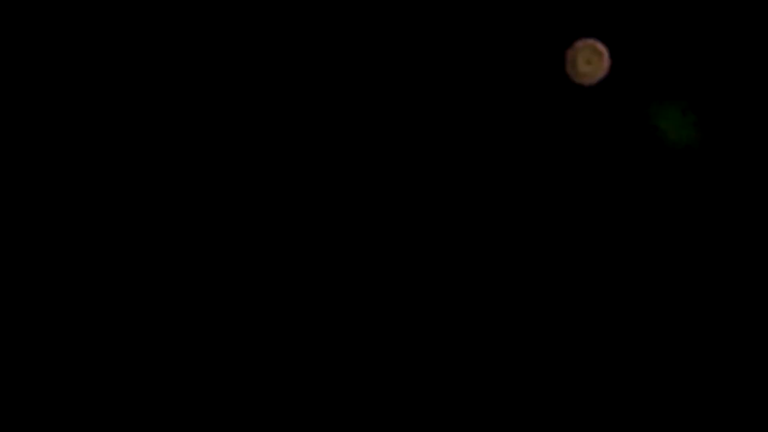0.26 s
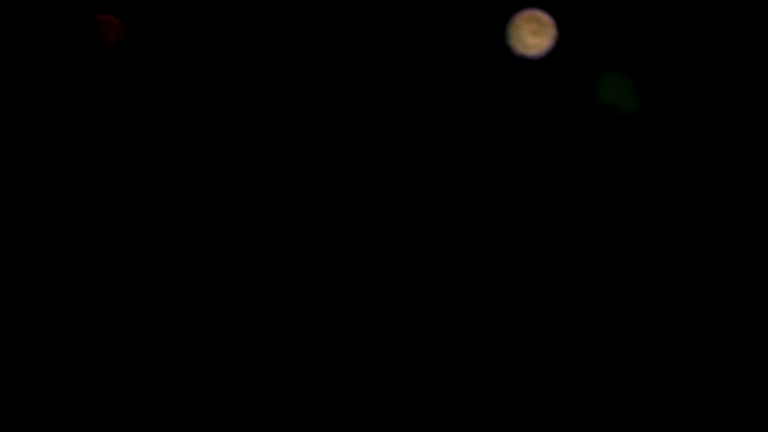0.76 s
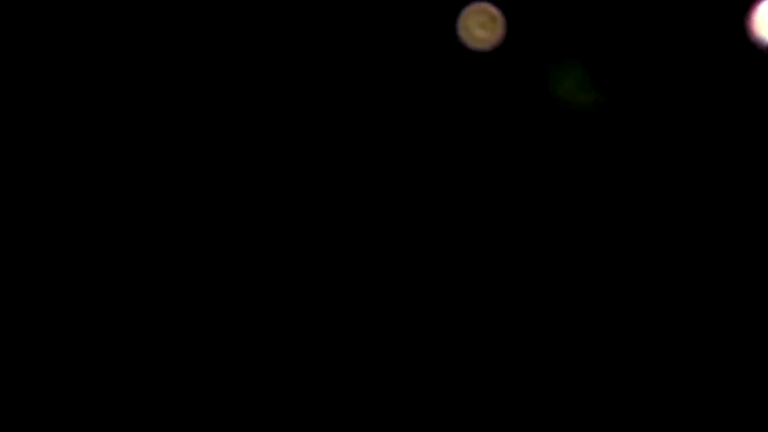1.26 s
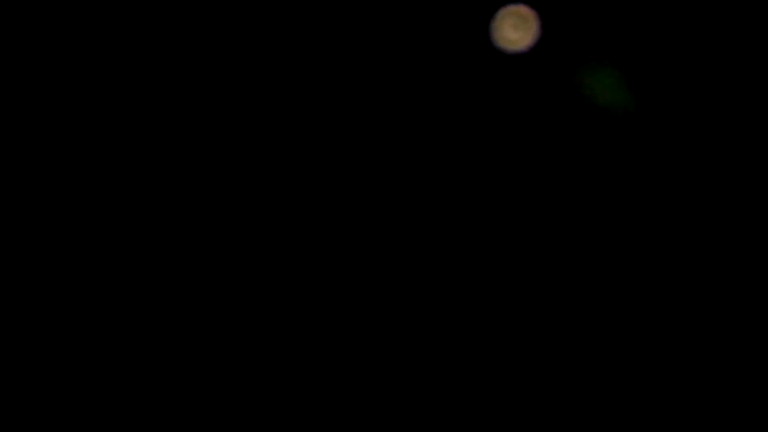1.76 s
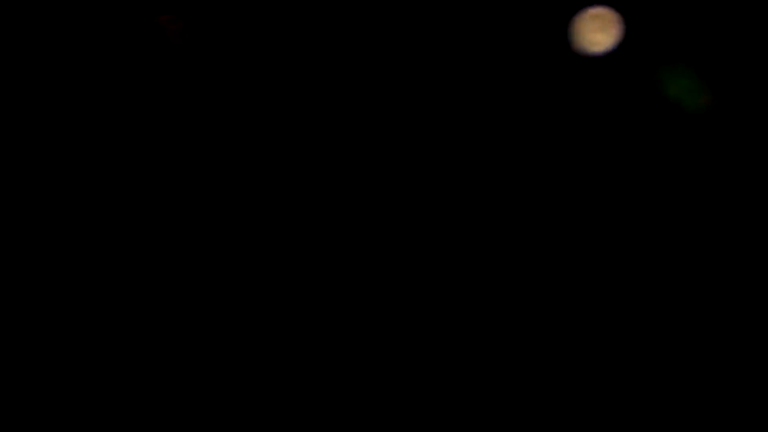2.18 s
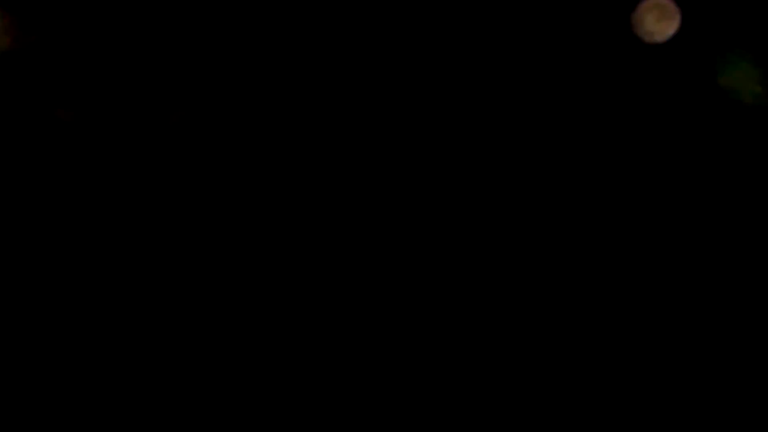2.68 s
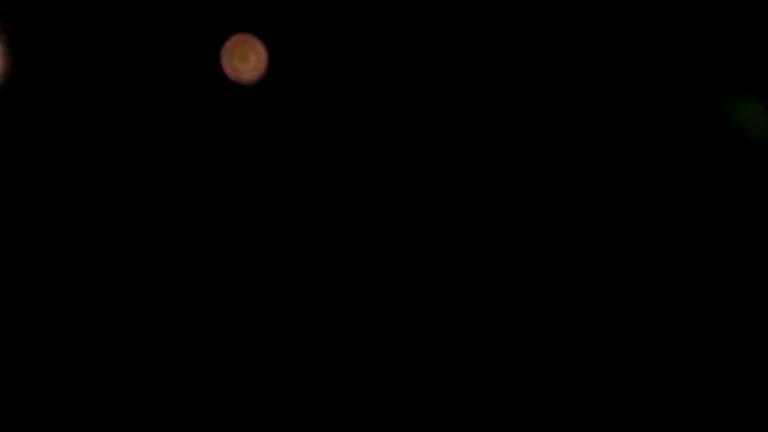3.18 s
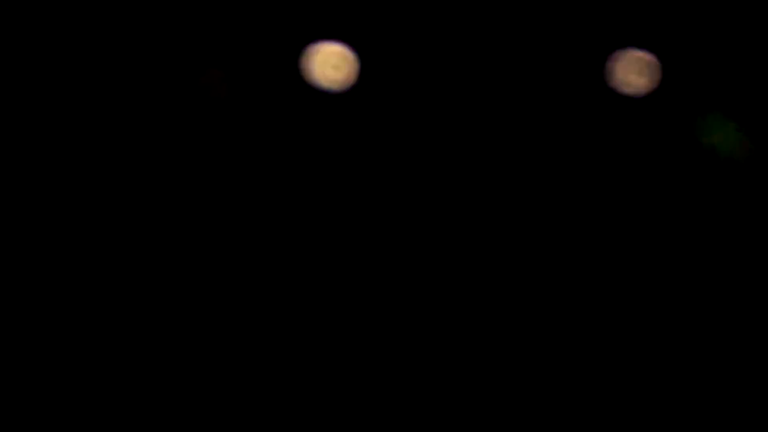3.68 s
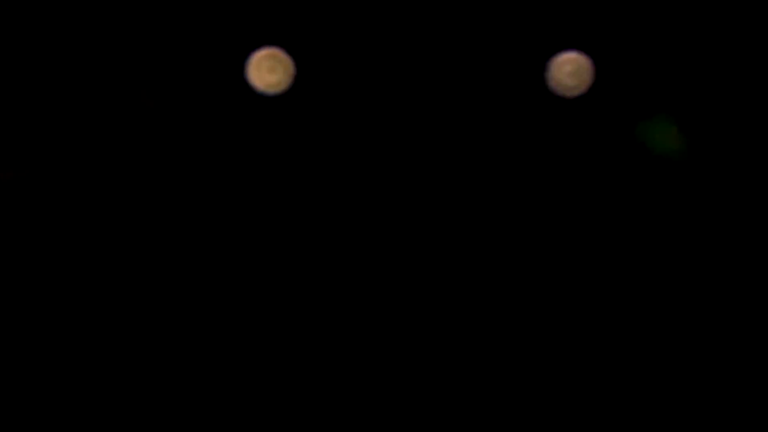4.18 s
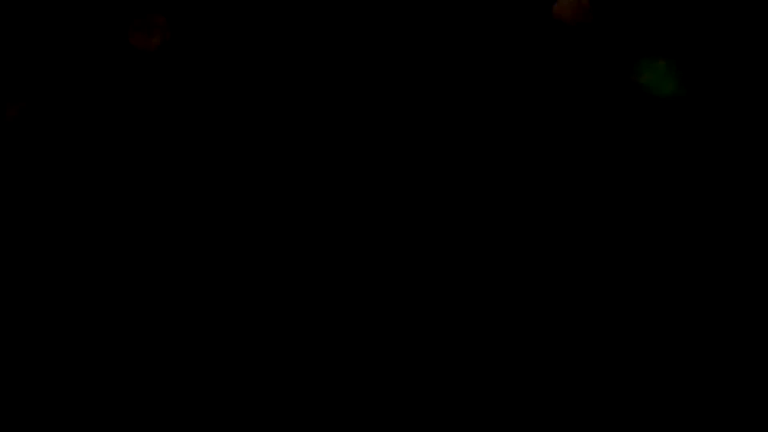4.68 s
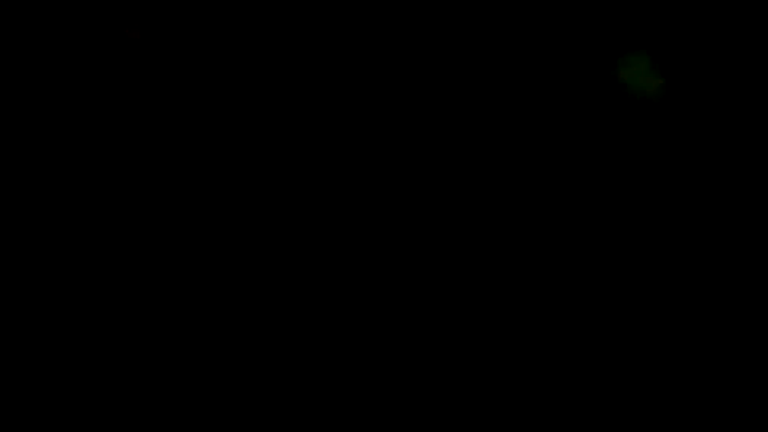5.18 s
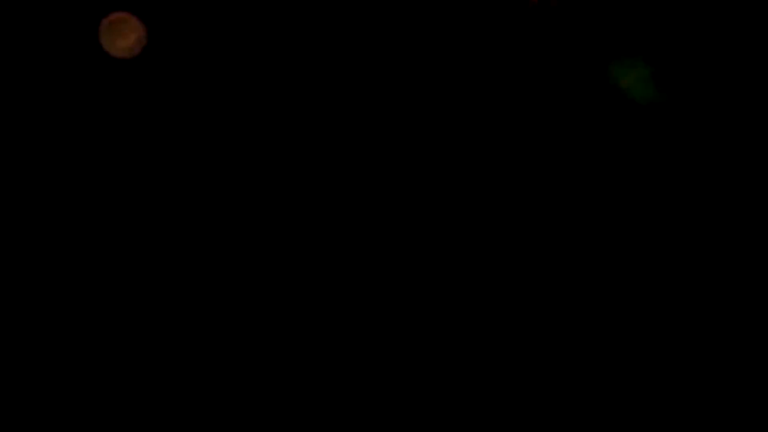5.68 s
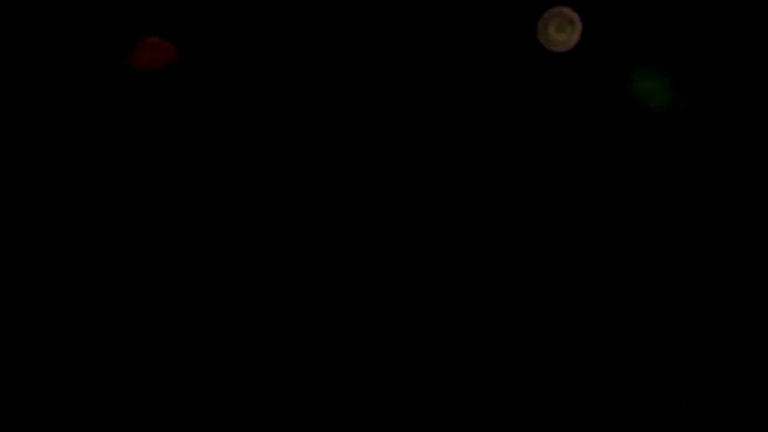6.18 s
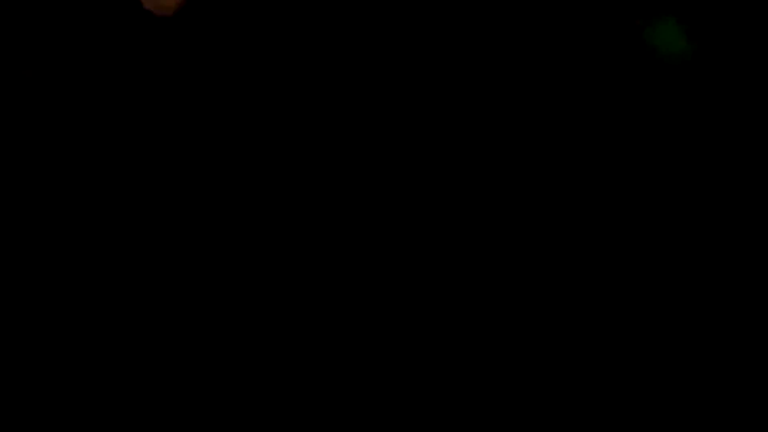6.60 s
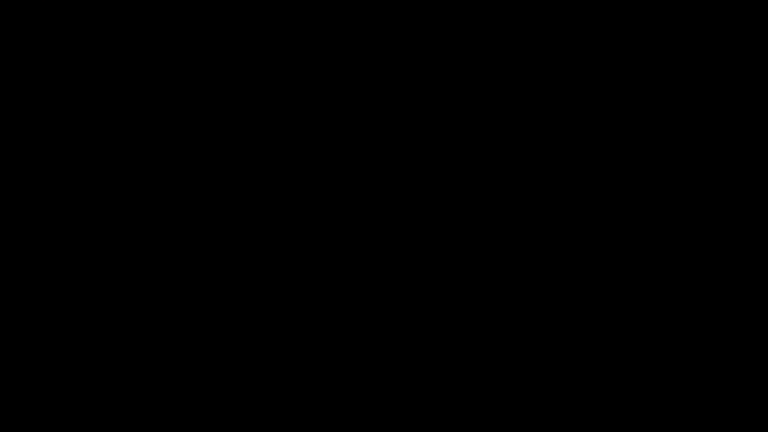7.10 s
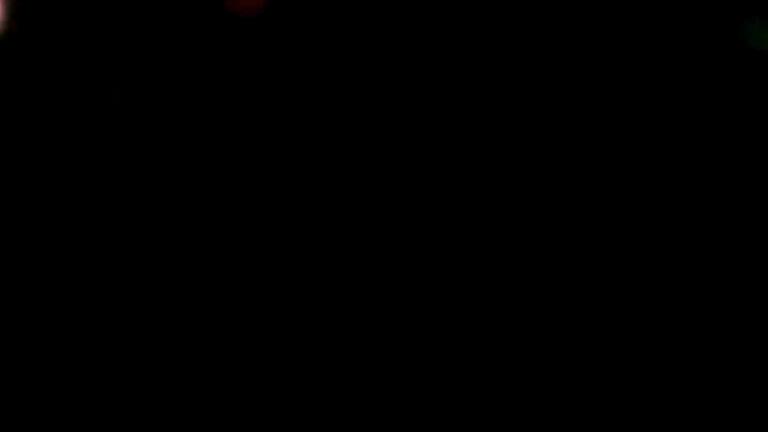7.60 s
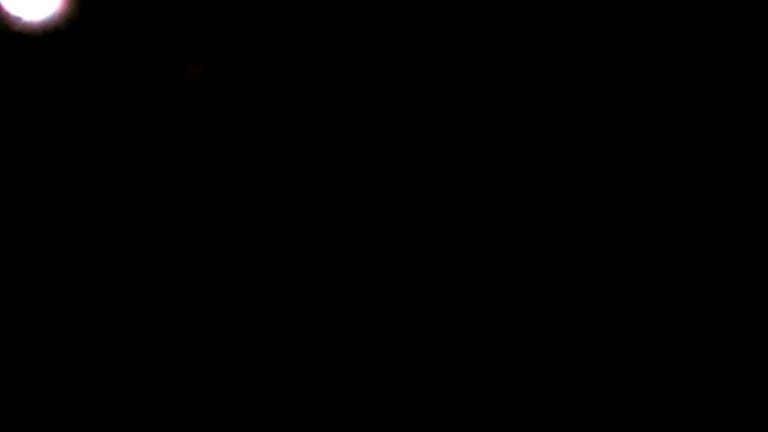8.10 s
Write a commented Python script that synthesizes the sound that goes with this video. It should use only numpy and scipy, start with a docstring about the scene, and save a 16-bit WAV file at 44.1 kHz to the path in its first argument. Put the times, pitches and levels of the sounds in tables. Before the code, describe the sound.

Outdoors at night, dry leaves tick and rustle near the microphone over a faint rumble, hum and insect hiss. A coyote gives two short hoarse barks, then a long howl slides slowly downward while more barks cut in. A second coyote joins with a higher, warbling howl, and after another bark a third follows with a yodeling, breaking call. The calls echo faintly over open ground.

```python
"""Dry leaves tick and rustle close by, over a night bed of distant rumble, faint hum and insect hiss.
A coyote barks hoarsely, puffs of air ringing its throat. Then three animals howl in turn, long pitched
calls that yodel and break, with more barks between them. Open ground smears each call and a far slope
returns it late. Two unequal microphone ports make the stereo image."""
import sys
import numpy as np
from scipy import signal
from scipy.fft import rfft, irfft, next_fast_len
from scipy.io import wavfile
from scipy.ndimage import uniform_filter1d

SR = 44100
rng = np.random.default_rng(int(sys.argv[2]) if len(sys.argv) > 2 else 0)


def transcribe(signal):
    """Save signal, clipped to [-1, 1], as a 16-bit WAV file at the path in sys.argv[1]."""
    frames = np.atleast_2d(signal).T
    limited = np.clip(frames, -1, 1)
    pcm = np.round(limited * 32767).astype(np.int16)
    wavfile.write(sys.argv[1], SR, pcm)


N = 367794
TIME = np.arange(N) / SR
FFT_SIZE = next_fast_len(N + SR)
HZ = np.maximum(np.arange(FFT_SIZE // 2 + 1) * SR / FFT_SIZE, 1)


def from_db(db):
    """Decibels to gain."""
    return 10 ** (np.asarray(db) / 20)


def unit_rms(x):
    """Scale to rms 1."""
    return x / np.sqrt(np.mean(x ** 2) + 1e-20)


def at_hz(curve, hz, column=1):
    """Read an EQ curve on a log-frequency axis."""
    curve = np.array(curve)
    return np.interp(np.log(hz), np.log(curve[:, 0]), curve[:, column])


def drift(per_s, size=N):
    """Random modulator with a spread of about 1."""
    knots = rng.standard_normal(int(size * per_s / SR) + 3)
    return np.interp(np.arange(size) * per_s / SR, np.arange(len(knots)), knots) * np.sqrt(1.5)


def resonance(x, hz, width_hz):
    """Two-pole resonator, gain 1 at its peak."""
    r = np.exp(-np.pi * width_hz / SR)
    gain = (1 - r * r) / 2
    return signal.lfilter([gain, 0, -gain], [1, -2 * r * np.cos(2 * np.pi * hz / SR), r * r], x + 1e-18)


def band(x, low_hz, high_hz):
    """Band-pass."""
    return signal.sosfilt(signal.butter(2, [low_hz, high_hz], "band", fs=SR, output="sos"), x + 1e-18)


def automation(times, *lanes):
    """A call's sample span, and each lane of breakpoints drawn across it."""
    span = slice(int(times[0] * SR), min(int(times[-1] * SR), N))
    return span, [np.interp(TIME[span], times, lane) for lane in lanes]


# EQ of the rumble and hiss: (frequency [Hz], gain [dB])
BED_EQ = [(25, -11), (50, -13), (66, 1), (101, 11), (130, 6.5), (194, -6.5), (305, -9), (733, -5),
          (2000, -8.5), (2600, -22.5), (5200, -19.5), (16000, -36)]
# how alike the bed is at the two ports: (frequency [Hz], correlation [0-1])
BED_CORRELATION = [(60, 0.54), (140, 1), (280, 0.38), (700, 0.61), (2000, 0.017), (5000, 0.043),
                   (10000, 0.064)]


def night_bed(floor_db=-53.5):
    """Distant rumble and hiss, partly shared by both ports, with mains hum and a band of insects."""
    left, spare = rfft(rng.standard_normal((2, FFT_SIZE)))
    alike = at_hz(BED_CORRELATION, HZ)
    pair = np.array([left, alike * left + np.sqrt(1 - alike ** 2) * spare])
    floor = from_db(floor_db) * unit_rms(irfft(pair * from_db(at_hz(BED_EQ, HZ)), FFT_SIZE)[:, :N])
    hum = from_db(-66.5 + 3.9 * drift(7.7)) * np.sin(2 * np.pi * 360 * TIME)
    insects = from_db(-71.5 + 5 * drift(25)) * unit_rms(resonance(rng.standard_normal(N), 5150, 270))
    return floor + hum + insects


def ring_out(hits, decay_s, soften_samples):
    """Turn impulses into decaying envelopes with a soft attack."""
    return uniform_filter1d(signal.lfilter([1], [1, -np.exp(-1 / (decay_s * SR))], hits), soften_samples)


# fader ride of the stirring leaves: (time [s], level [dB])
LEAF_STIR = [(0, -74), (.24, -68.5), (.9, -73.5), (1.6, -68), (2.2, -68.5), (2.55, -73.5), (2.84, -81),
             (2.92, -61), (3.24, -75.5), (3.3, -65), (3.8, -71.5), (4.3, -70.5), (5.6, -66.5),
             (6.34, -73.5), (6.85, -71.5), (7.3, -66.5), (7.8, -68), (8.34, -70)]
# EQ of the leaf noise: (frequency [Hz], gain [dB])
LEAF_EQ = [(1500, -68), (2500, -5.5), (4200, 8), (6400, 1.5), (8600, 5.5), (9900, -1), (14500, -5),
           (16000, -11)]
# featured leaf ticks: (time [s], hit level [dB], treble against body [dB])
LEAF_TICKS = [(0.4296, -40, 5), (0.684, -37, -15), (0.857, -55.5, 20), (0.935, -42, 7), (1.0124, -30, -34),
              (1.209, -33, -8), (1.5125, -55.5, 12.5), (1.84, -43, 4.5), (2.158, -48, 3), (2.351, -39, -2),
              (2.491, -35.5, -37), (2.641, -40, 3), (2.9507, -37, -18), (2.9946, -39, 8),
              (3.2926, -33.5, 5.5), (3.4204, -34.5, 1.5), (3.596, -39, -1), (3.7585, -40, 2),
              (3.826, -37, 4), (3.911, -39, 9), (3.9656, -32, -19), (4.0284, -30, -12), (4.06, -40, -14),
              (4.356, -38, -38), (4.492, -38, 6), (4.52, -36, -13), (4.6122, -42, -29), (4.9398, -36, -4),
              (5.139, -40, -2), (6.2785, -36, -40), (6.3894, -42, 5), (6.458, -59, 24.5),
              (6.5824, -32, -18), (7.0095, -30.5, -15), (7.076, -31, -32), (7.272, -32, -7),
              (7.76, -31, -5)]


def leaves(ticks_per_s, small_db, spread_db):
    """Dry leaves hiss in patches and tick: a crack, then a short wash. Small ticks fall in clumps."""
    tick_s, tick_db, treble_db = np.transpose(LEAF_TICKS)
    tick_at = np.round(tick_s * SR).astype(int)
    stir_db = np.interp(TIME, *np.transpose(LEAF_STIR))
    clumps = drift(12)
    small_ticks = rng.random(N) < ticks_per_s * from_db(2.2 * clumps) / SR
    size_db = stir_db + small_db + spread_db * np.minimum(rng.exponential(1, N), 2.5)
    white = rng.standard_normal((3, FFT_SIZE))
    wide = 0.11 * white[0] + 3.7 * white[1:]
    grain = unit_rms(irfft(rfft(wide) * from_db(at_hz(LEAF_EQ, HZ)), FFT_SIZE)[:, :N])
    out = 0
    for low_hz, high_hz, small_trim_db, tick_trim_db in [
            (1730, 3950, -1, 2), (4210, 5460, 1.5, 2),
            (6750, 9700, -2, treble_db - .5), (10600, 15700, -.5, treble_db - 2)]:
        # a random gain in each band gives every tick its own colour
        hits = small_ticks * from_db(size_db + small_trim_db + rng.normal(0, 6, N))
        hits[tick_at] = from_db(tick_db + tick_trim_db + rng.normal(-1, 3.5, len(tick_at)))
        crack = ring_out(hits, decay_s=.0014, soften_samples=170)
        wash = .15 * ring_out(hits, decay_s=.014, soften_samples=420)
        hiss = from_db(stir_db + 11 + 2 * clumps + 2.3 * drift(19))
        out = out + (crack + wash + hiss) * band(grain, low_hz, high_hz)
    return out


def bark_contour(start, attack, hold, release, start_hz=492.3, top_hz=702, rise_s=.075):
    """One bark swells, holds and drops while its pitch climbs, then stays."""
    t = np.linspace(0, attack + hold + release, 40)
    attack_db = -15.5 * (1 - np.clip(t / attack, 0, 1)) ** 2
    release_db = -27 * np.clip((t - attack - hold) / release, 0, 1)
    rise = np.sin(np.pi / 2 * np.clip(t / rise_s, 0, 1)) ** 2
    return automation(start + t, start_hz + (top_hz - start_hz) * rise, attack_db + release_db)


# bark cues: (start [s], attack [s], hold [s], release [s], level [dB], roughness [capped at 1],
# upper throat [dB], treble [dB])
BARK_CUES = [(0.576, 0.069, 0.037, 0.026, -33, 1.2, 3.5, -7),
             (1.333, 0.009, 0.093, 0.011, -30.5, 0.33, 0, -3),
             (3.032, 0.049, 0.045, 0.075, -31, 1.07, 0.5, -11),
             (4.119, 0.035, 0.053, 0.021, -30.5, 0.86, 0.5, -8.5),
             (4.631, 0.091, 0.0068, 0.014, -30.5, 0.42, 5, -5),
             (6.634, 0.053, 0.035, 0.048, -32.5, 0.81, 0.5, -9.5)]
# throat formants: (frequency [Hz], width [Hz], gain [dB])
THROAT_FORMANTS = [(661, 123, -16), (1203, 430, -3.5), (1840, 215, 5.5), (2614, 260, -14),
                   (3720, 1500, -20), (7500, 2470, -17.5)]


def barks(hoarse_tilt_db, flutter_db):
    """One puff of air per cycle rings the throat; a hoarse bark is uneven and brighter."""
    puffs, envelope, hoarse, upper_db, treble_db = np.zeros((5, N))
    for *timing, level_db, rough, upper, treble in BARK_CUES:
        span, (pitch, shape_db) = bark_contour(*timing)
        rough = min(rough, 1)
        cycles = np.flatnonzero(np.diff(np.floor(np.cumsum(pitch) / SR)))
        shimmer, jitter = rng.standard_normal((len(cycles), 2)).T
        every_third = np.cos(2 * np.pi * np.arange(len(cycles)) / 3)   # accents that make the growl
        strength = (1 + rough * (.9 * every_third + .28 * shimmer)) / np.sqrt(1 + .8 * rough ** 2)
        late = (.07 * rough * jitter * SR / pitch[cycles]).astype(int)
        puffs[span.start + cycles + late] = strength / np.sqrt(pitch[cycles])
        envelope[span] = from_db(level_db + shape_db)
        hoarse[span], upper_db[span], treble_db[span] = rough, upper, treble
    voice = 0
    for k, (hz, width, db) in enumerate(THROAT_FORMANTS):
        formant = (-1) ** k * resonance(resonance(puffs, hz, width), hz, 1.35 * width)
        tone_db = db + (k > 1) * upper_db + (k > 3) * treble_db
        tilt_db = hoarse_tilt_db * min(k, 2) * (hoarse - 1.52)
        voice += from_db(tone_db + tilt_db + flutter_db * drift(60)) * formant
    return envelope * voice / np.sqrt(np.mean(voice[envelope > 0] ** 2))


# melody per phrase, far animal first: (time [s], pitch [Hz], base level [dB], tilt [dB/octave])
HOWL_PHRASES = [
    [(1.58, 467, -55, -9), (1.64, 637, -52.5, -10), (1.67, 684, -55, -4), (1.685, 750, -45.5, 0),
     (1.692, 861, -41, -2.5), (1.78, 871.6, -34.5, 2), (1.87, 851, -42.5, -2.5), (1.96, 874, -36, 1),
     (2.148, 838.7, -42.5, -1.5), (2.165, 787, -52, -10.5), (2.31, 744.3, -53, -0.5), (2.44, 733, -58, 3),
     (2.57, 714.6, -55, 0.5), (2.7, 690, -58, -4), (2.85, 696.5, -61, -6), (3.3, 675.7, -53.5, 0),
     (3.55, 690.6, -59, -8), (3.733, 668.2, -52.5, 0), (3.867, 643, -53, -7), (4.0, 605, -52.5, -5),
     (4.26, 534.7, -50.5, -3), (4.4, 489, -59, -6), (4.53, 542, -50.5, -3), (4.6, 569, -61.5, -16),
     (4.8, 600.6, -54.5, -2.5), (5.3, 581.5, -55, -4.5)],
    [(4.715, 861, -49, 9), (4.8, 930, -46.5, 8), (4.9, 1006, -43, -3.5), (5.0, 1028, -43.5, -4.5),
     (5.1, 1089, -44.5, -9.5), (5.216, 1116, -41, -10)],
    [(5.214, 1008, -37, 5.5), (5.309, 1031, -39.5, 8.5), (5.42, 1036, -41, 16), (5.5, 1032, -40, 11),
     (5.58, 1012, -39, 8), (5.685, 953, -43.5, 11), (5.703, 1050, -48.5, -2), (5.73, 1063, -49, 1),
     (5.76, 1017, -43, 5), (5.79, 896, -41.5, 17.5), (5.82, 877, -44.5, 6.5), (5.876, 1095, -42.5, 11),
     (5.882, 1282, -36, 16), (5.908, 1245, -38, 19), (5.915, 995, -40, 9), (5.95, 958, -46.5, 14),
     (6.01, 1012, -38, 10.5), (6.07, 972.4, -47.5, 10.5), (6.13, 1010, -40, 15), (6.19, 934, -54.5, 8.5),
     (6.23, 789, -47, 1.5), (6.3, 736, -50.5, 4), (6.33, 676.6, -53.5, -1), (6.42, 694, -73.5, -7)],
    [(6.89, 485, -46.5, -10), (6.93, 640, -50.5, -13), (6.97, 805, -44, -3), (7.0, 808, -44, -2.5),
     (7.065, 834, -48.5, -11.5), (7.13, 865, -39.5, 10), (7.17, 798.5, -41.5, 1.5), (7.3, 840, -41.5, 0.5),
     (7.33, 694, -46, 13), (7.362, 703, -40.5, 5), (7.368, 821, -39.5, 0.5), (7.45, 808.7, -47, 2.5),
     (7.512, 776, -45.5, 2), (7.527, 670, -42.5, 13), (7.58, 652.7, -44, 25), (7.672, 677.5, -48, 6),
     (7.679, 765, -49, -5), (7.764, 751, -45.5, -2), (7.842, 732.7, -53.5, -2.5), (8.0, 723, -49, -8),
     (8.15, 682, -51.5, -8), (8.185, 653, -43, 18), (8.2, 570.5, -53.5, 15), (8.25, 544, -46, 1.2),
     (8.34, 601, -49, -5)],
]
# who sings each phrase, the second animal taking two: (animal [index])
SINGERS = [0, 1, 1, 2]
# mouth EQ on partials 1-3, per phrase: (frequency [Hz], gain [dB])
MOUTH_EQ = [
    [(480, -14), (620, -8), (700, 19), (860, -5.5), (1100, 7), (1325, 5.5), (1385, 1.5), (1550, 9.5),
     (1750, 0), (2100, 9), (2600, -11)],
    [(870, 10.5), (1000, 8.5), (1110, 5.5), (1750, 11), (1900, 10), (2200, 1.5), (2650, -13.5),
     (3300, -13.5)],
    [(700, 3.5), (900, 14.5), (1050, 17.5), (1250, 26.5), (1500, 1.5), (1800, -5.5), (2080, 6), (2350, -3),
     (2600, 8), (2900, -6), (3150, -29), (3700, -20)],
    [(520, -21), (670, 4.5), (800, 2.5), (1100, 4.5), (1350, 11.5), (1650, 10), (2000, -8), (2250, -2.5),
     (2500, -7.5)],
]
# fader ride of partials 4-12, per animal: (time [s], level [dB])
UPPER_RIDE = [
    [(1.7, -74), (2.3, -73), (2.7, -56.5), (3.3, -66), (4.0, -67)],
    [(4.7, -59), (5.2, -65), (5.31, -50.5), (5.55, -50.5), (5.67, -46), (5.73, -43.5), (5.8, -47.5),
     (5.9, -40.5), (6.0, -54.5), (6.19, -49.5), (6.36, -77)],
    [(6.9, -57), (7.05, -61), (7.13, -48), (7.19, -60), (7.35, -46.5), (7.42, -53), (7.53, -43),
     (7.7, -51.5), (8.0, -67), (8.2, -59), (8.34, -64)],
]
# EQ on partials 4-12, per animal: (frequency [Hz], gain [dB])
UPPER_EQ = [
    [(2300, -4), (2800, -4.5), (3400, -11), (5000, -17), (5700, -8), (6500, -38)],
    [(3500, 2), (4200, -15), (5200, -1), (6200, -2.5), (7300, 1.5), (8300, 1), (9300, 0.5), (10300, -15),
     (11400, -6.5), (12500, -29)],
    [(2700, 5.5), (3400, -19.5), (3950, -9), (4250, 1.5), (4600, -17.5), (5000, -18), (5900, -5.5),
     (6800, -22.5)],
]
# strong-weak cycles add subharmonics half-way between partials: (start [s], end [s], level [dB])
SUBHARMONIC_SPELLS = [(4.717, 5.008, -64), (6.978, 6.99, -51.5), (7.358, 7.415, -60), (7.48, 7.66, -53),
                      (7.7, 7.978, -54.5), (8.175, 8.231, -64.5)]
# subharmonic EQ per animal, none for the farthest: (frequency [Hz], gain [dB])
SUBHARMONIC_EQ = [ None, [(400, -18), (1100, 8), (1500, 24.5), (1900, 15), (2250, 6), (2580, 13.5),
                  (3100, -20), (5000, -35)], [(400, -12), (1000, 1), (1200, 10.5), (1650, 8), (1950, 11.5),
                  (2300, 2), (2570, 14.5), (2690, 1), (3100, -19), (3700, -22), (4280, 6.5), (5000, -58)], ]
# the howl turns hoarse: (start [s], end [s], roughness [0-1])
HOARSE_SPELLS = [(1.58, 1.68, .5), (4.2, 4.34, .3), (4.71, 4.8, .6), (5.85, 5.93, .35), (6.2, 6.3, .4),
                 (6.3, 6.42, .6), (6.89, 7.0, .35), (7.3, 7.38, .15), (7.5, 7.54, .2), (8.17, 8.22, .5)]
# warbles, where high partials turn breathy and the highest fade: (start [s], end [s])
WARBLE_SPELLS = [(5.64, 6.42), (7.3, 7.7)]


def howl_partials(phrase, t, pitch, level_db, tilt_db, slide, warble, fade_db_per_s=604):
    """The balance of a howl, as (multiple of the pitch, level curve [dB]) pairs."""
    animal = SINGERS[phrase]
    partials = [(k, level_db + tilt_db * np.log2(k / 2) + at_hz(MOUTH_EQ[phrase], k * pitch))
                for k in (1, 2, 3)]
    if SUBHARMONIC_EQ[animal]:
        sub_db = np.max([db - fade_db_per_s * np.abs(t - np.clip(t, start, end))
                         for start, end, db in SUBHARMONIC_SPELLS], axis=0)
        partials += [(k, sub_db + at_hz(SUBHARMONIC_EQ[animal], k * pitch)) for k in np.arange(7) + .5]
    # the vocal folds close less sharply while the pitch slides
    upper_db = np.interp(t, *np.transpose(UPPER_RIDE[animal])) - 14 * slide
    for k in range(4, 13):
        tone_db = at_hz(UPPER_EQ[animal], k * pitch) - 10 * warble * (k * pitch > 8400)
        partials.append((k, upper_db + tone_db + 3 * drift(14, len(t))))
    return partials


def howl(phrase, waver, flutter_db, break_rasp, break_dip_db):
    """Vocal folds sing clean partials on one gliding pitch; the voice rasps and dips where it breaks."""
    span, (pitch, level_db, tilt_db) = automation(*np.transpose(HOWL_PHRASES[phrase]))
    size, t = len(pitch), TIME[span]
    rough = sum(amount * ((t > start) & (t < end)) for start, end, amount in HOARSE_SPELLS)
    rough = uniform_filter1d(rough, 600)
    warble = uniform_filter1d(sum(1. * ((t > start) & (t < end)) for start, end in WARBLE_SPELLS), 2000)
    wobble = waver * (drift(30.21, size) + 1.25 * drift(250, size)) + .03 * rough * drift(180, size)
    phase = 2 * np.pi * np.cumsum(pitch * (1 + wobble)) / SR
    glide = uniform_filter1d(np.abs(np.gradient(np.log(pitch))) * SR, 550)   # relative change per s
    slide = np.clip(glide / 4, 0, 1)
    voice = 0
    for k, db in howl_partials(phrase, t, pitch, level_db, tilt_db, slide, warble):
        # moving air makes each partial flutter on its own and sink now and then
        air_db = flutter_db * (drift(44.93, size) - .86 * np.maximum(drift(14, size), 0) ** 2)
        breakup_db = -3 * slide * np.abs(drift(55, size))
        breath = 1 + .45 * warble * (k * pitch > 3500) * drift(700, size)
        voice += from_db(uniform_filter1d(db, 700) + air_db + breakup_db) * breath * np.sin(k * phase)
    dip = from_db(-break_dip_db * np.clip(glide / 6 - 1, 0, 1))
    rasp_depth = break_rasp * np.clip(glide / 5, .15, 1) + .6 * rough
    rasp = 1 + rasp_depth * drift(400, size)
    out = np.zeros(N)
    out[span] = np.sqrt(2) * voice * dip * rasp * signal.windows.tukey(size, 600 / size)
    return out


def open_ground(calls, near_db, near_t60_s, far_db, far_s, far_smear_s):
    """Scatter from trees and ground dies fast; a far slope answers late and dull. Paths differ by port."""
    t = np.arange(2 * SR) / SR
    near = np.exp(-np.log(1000) * t / near_t60_s) * (t > .012)
    far = np.exp(-.5 * ((t - far_s) / far_smear_s) ** 2)
    scatter = rng.standard_normal((2, len(t)))
    ground = from_db(near_db) * band(near / np.linalg.norm(near) * scatter, 510, 17000)
    slope = from_db(far_db) * band(far / np.linalg.norm(far) * scatter, 890, 1710)
    return signal.fftconvolve(calls[None], ground + slope, axes=1)[:, :N]


def scene():
    """The stereo mix: centred coyotes amid their echoes, the night bed and the leaves."""
    calls = barks(hoarse_tilt_db=9, flutter_db=2.4)
    for phrase in range(len(HOWL_PHRASES)):
        calls += howl(phrase, waver=.0025, flutter_db=1.7, break_rasp=.2, break_dip_db=4)
    echoes = open_ground(calls, near_db=-11.5, near_t60_s=.45, far_db=-22, far_s=1.02, far_smear_s=.08)
    return calls + echoes + night_bed() + leaves(ticks_per_s=70, small_db=9, spread_db=6.5)


# right port against the left: (frequency [Hz], gain [dB], extra phase lead [rad])
RIGHT_PORT_EQ = [(40, 5, 2.5), (213, -1.5, 1.5), (393, -4, 2.5), (670, -5, 2.5), (940, -4.5, 1.72),
                 (1560, -7, 0.43), (1998, -2, -0.98), (2116, 2, 2.5), (2946, 5, -5.5), (4660, 0, -5.5),
                 (6400, 0.5, -4), (7670, -11.5, -9.5), (9700, -8.5, -9.5), (11140, -9.5, -0.5),
                 (15500, -2, -13)]


def record(dry):
    """The right port has its own colour and phase and hears a little earlier; both lose the very top."""
    lead_s, cutoff_hz = 17 / SR, 16150
    phase = at_hz(RIGHT_PORT_EQ, HZ, column=2) + 2 * np.pi * HZ * lead_s
    response = from_db(at_hz(RIGHT_PORT_EQ, HZ)) * np.exp(1j * phase)
    right = irfft(rfft(dry[1], FFT_SIZE) * response, FFT_SIZE)[:N]
    return signal.sosfilt(signal.cheby2(24, 70, cutoff_hz, fs=SR, output="sos"), [dry[0], right])


dry = scene()
out = record(dry)
transcribe(out)
```